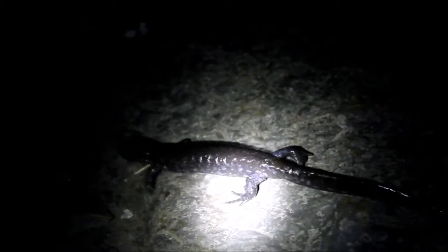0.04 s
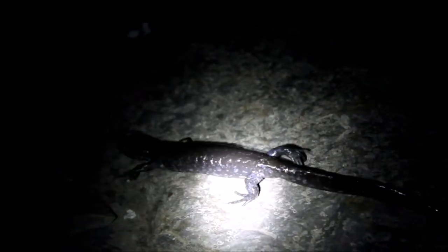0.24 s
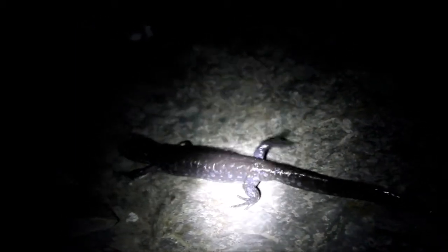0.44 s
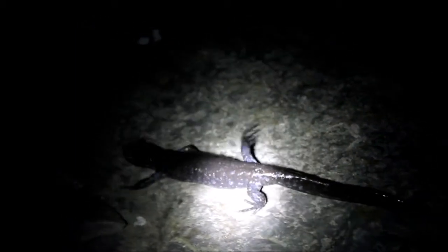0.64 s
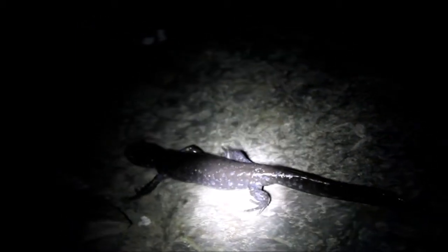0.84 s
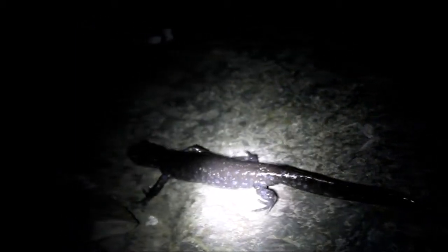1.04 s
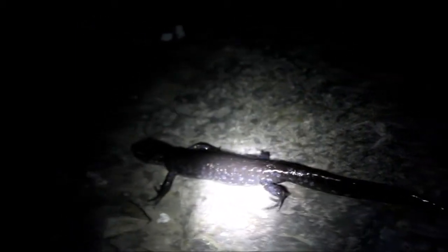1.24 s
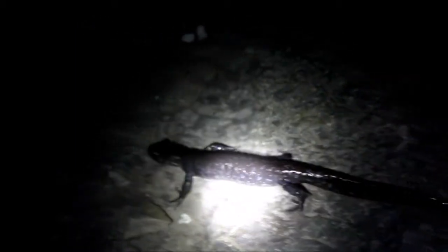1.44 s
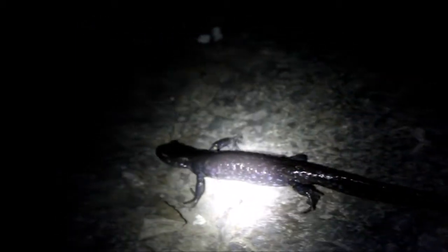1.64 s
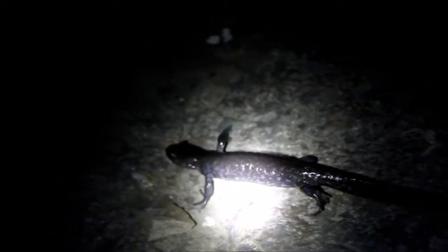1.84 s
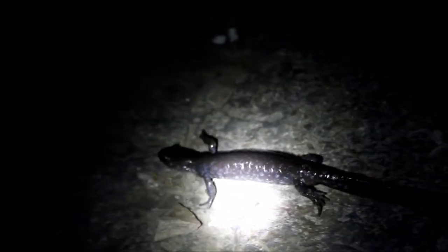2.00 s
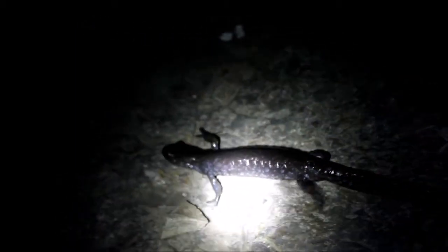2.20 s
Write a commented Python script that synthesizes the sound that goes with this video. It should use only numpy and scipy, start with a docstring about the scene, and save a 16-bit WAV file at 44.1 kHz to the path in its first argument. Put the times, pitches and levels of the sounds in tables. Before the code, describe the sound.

A chorus of tiny peeping frogs, mostly at middle distance with a soft woodland echo; two calls are close to the microphone, one rasping, one clean, over a quiet night floor with slight leaf ticks and a knock.

```python
"""A spring peeper close to the microphone gives one clean rising whistle at night, rasping at its start and end.
Another close frog cracks into a rasp; the rest call farther off around the pond and ring on among the trees.
Whistles are gliding sums of partials, their echoes are decaying noise tails; rasps are shaped noise.
A small knock (damped modes), a few ticks and soft rustling in the damp leaf litter (noise) lie over
a quiet night floor."""
import sys
import numpy as np
from scipy import signal
from scipy.fft import rfft, irfft
from scipy.io import wavfile

SR = 44100
rng = np.random.default_rng(int(sys.argv[2]) if len(sys.argv) > 2 else 0)


def persist_wave(psi):
    """Save psi, clipped to +-1, as 16-bit WAV."""
    counts = np.round(np.clip(psi, -1, 1) * 32767).astype(np.int16)
    wavfile.write(sys.argv[1], SR, np.atleast_2d(counts).T)


N = 99886
T = np.arange(N) / SR


def undb(db):
    """Decibels to gain."""
    return 10 ** (np.asarray(db) / 20)


def noise(gain):
    """Unit-rms noise whose spectrum is gain(Hz)."""
    hz = np.arange(N // 2 + 1) * SR / N + 1e-3  # the offset keeps 0 Hz out of logs and divisions
    x = irfft(rfft(rng.standard_normal(N)) * gain(hz), N)
    return x / x.std()


def band(hz, width_hz):
    """Noise in one resonance with steep skirts."""
    return noise(lambda f: 1 / (1 + ((f * f - hz * hz) / (f * width_hz)) ** 2))


def coloured(points):
    """Unit-rms noise with a spectrum drawn through (Hz, dB) points."""
    hz, db = np.array(points).T
    return noise(lambda f: undb(np.interp(np.log(f), np.log(hz), db)))


def walk(rate_hz):
    """Smooth random wandering with unit spread."""
    return noise(lambda f: np.exp(-(f / rate_hz) ** 2))


def fade(start, decay_s):
    """Sudden onset and exponential decay."""
    return (T >= start) * np.exp(-np.maximum(T - start, 0) / decay_s)


def low_cut(x, hz):
    """Second-order high-pass that takes the lows off."""
    return signal.sosfilt(signal.butter(2, hz, "high", fs=SR, output="sos"), x)


# Spectrum of the open night air: f/Hz, relative level/dB per Hz
NIGHT_COLOUR = [(25, -12), (50, -2), (110, 2.5), (200, 1.5), (450, -3.5), (1000, -4), (2000, -6),
                (4000, -10.5), (6500, -11.5), (8500, -14.5), (10500, -19.5), (15800, -19)]
NIGHT_DB = -59.5


def night_floor():
    """The steady quiet bed behind everything, as coloured noise."""
    return undb(NIGHT_DB) * coloured(NIGHT_COLOUR)


# Rustle on the ground, level followed over time: t/s, level/dB
RUSTLE_LEVELS = [(0, -58.5), (.4, -59), (.55, -69), (1.05, -71.5), (1.32, -53.5), (1.6, -59), (1.8, -63),
                 (2.26, -66)]
# Spectrum of the rustle: f/Hz, relative level/dB per Hz
RUSTLE_SPECTRUM = [(60, -22), (250, -4), (470, 7), (900, -5.5), (1400, 3.5), (2000, -10), (4500, -9),
                   (9000, -24.5), (15800, -31)]


def rustle():
    """Soft rustling in the damp leaves: coloured noise whose level wavers about the table."""
    db = np.interp(T, *np.array(RUSTLE_LEVELS).T) + 1.7 * walk(40)
    return undb(db) * coloured(RUSTLE_SPECTRUM)


# Ticks in the litter: t/s, onset level/dB before the low cut, centre f/Hz, width/Hz
LITTER_TICKS = [(0.941, -45.5, 5560, 4500), (1.169, -45.5, 5700, 4500), (1.36, -53.5, 13000, 3000),
                (1.406, -61, 13000, 3970), (1.452, -34.5, 1350, 296), (1.453, -41, 3380, 2500),
                (1.531, -45.5, 6000, 7000), (1.581, -50, 5700, 6000)]
TICK_DECAY_S = 0.003


def ticks(low_cut_hz=900):
    """Ticks in the damp leaves: short bursts of resonant noise."""
    bursts = sum(undb(db) * fade(start, TICK_DECAY_S) * band(hz, width_hz)
                 for start, db, hz, width_hz in LITTER_TICKS)
    return low_cut(bursts, low_cut_hz)


# Damped modes of the knock: f/Hz, onset level/dB before the low cut, 60 dB decay time/s
KNOCK_MODES = [(454, -35, 0.025), (730, -29.5, 0.017), (1015, -32.5, 0.0091), (3690, -32.5, 0.0094),
               (6470, -31.5, 0.005), (8070, -34, 0.0086), (10100, -65, .006)]
KNOCK_S = 1.8537
CRACK_DB, CRACK_DECAY_S = -39.5, 0.002  # levels before the low cut
THUD_DB, THUD_DECAY_S = -44.5, 0.009


def knock(low_cut_hz=130):
    """A small hard contact near the microphone: crack, damped modes and a dull thud."""
    ring = sum(undb(db) * fade(KNOCK_S, t60 / np.log(1000)) * np.sin(2 * np.pi * hz * (T - KNOCK_S))
               for hz, db, t60 in KNOCK_MODES)
    crack = undb(CRACK_DB) * fade(KNOCK_S, CRACK_DECAY_S) * band(4500, 13000)
    thud = undb(THUD_DB) * fade(KNOCK_S, THUD_DECAY_S) * band(600, 1100)
    return low_cut(ring + crack + thud, low_cut_hz)


WOODS_T60_S, WOODS_DELAY_S, WOODS_GRAIN = 0.71, 0.012, 0.97  # grain: unevenness of the tail
WOODS_HZ, WOODS_WIDTH_HZ = 2600, 1400  # the band that carries between the trunks


def woods(x):
    """Echo from many trunks, different for each calling place, with the energy of the direct call."""
    grain = np.exp(WOODS_GRAIN * walk(200))
    decay = np.exp(-np.log(1000) * T / WOODS_T60_S) * (T > WOODS_DELAY_S)
    tail = band(WOODS_HZ, WOODS_WIDTH_HZ) * grain * decay
    echo = signal.fftconvolve(x, tail)[:len(x)]
    return echo * np.sqrt(np.sum(x ** 2) / np.sum(echo ** 2))


ATTACK_S, RELEASE_S = 0.015, 0.019
GLIDE_EASE, WAVER = 0.492, 0.0024  # early climb of the glide, random spread as a fraction of the pitch
# the call is loudest in the middle, with flutter; its overtones grow in over the first half
FLUTTER_DB, SWELL_DB, BLOOM_DB = 1.5, 0.5, 11.5


def peep(start, length, from_hz, to_hz, db, echo_db, partials):
    """One whistle: the pitch climbs and levels off as the vocal sac fills."""
    u = np.clip(T / length, 0, 1)
    glide = u + GLIDE_EASE * u * u * (1 - u) * 2
    hz = (from_hz + (to_hz - from_hz) * glide) * (1 + WAVER * walk(46))
    phase = np.pi * np.cumsum(hz) / SR  # half the pitch: the whistle is the second multiple

    on = T < length
    bloom = undb(BLOOM_DB * np.minimum(2 * u[on] - 1, 0))
    call = np.zeros(N)
    for k, (_, partial_db) in enumerate(partials, 1):
        call[on] += undb(partial_db) * np.sin(k * phase[on]) * (bloom if k > 2 else 1)

    ramp = np.clip(np.minimum(T / ATTACK_S, (length - T) / RELEASE_S), 0, 1)
    swell_db = SWELL_DB * (np.sin(np.pi * u) - 2 / np.pi)
    call *= np.sin(np.pi / 2 * ramp) ** 2 * undb(FLUTTER_DB * walk(55) + swell_db)

    # direct and echo share the level
    heard = (call + undb(echo_db) * woods(call)) * undb(db) / np.hypot(1, undb(echo_db))
    return np.interp(np.arange(N) - round(start * SR), np.arange(N), heard, left=0, right=0)


# Calls around the pond: start t/s, length t/s, start f/Hz, end f/Hz, rms level/dB with echo,
# echo level/dB re direct, level/dB re whistle of the undertone an octave below
POND_CALLS = [(-0.12, 0.23, 2604, 2916, -43, 3, -17), (-0.01, .17, 2648, 2941, -38.5, 2.5, -21),
              (0.107, 0.12, 2560, 2795, -39, -2.5, -18.5), (0.15, 0.15, 2650, 2896, -40, 2.5, -21.5),
              (0.225, 0.21, 2720, 2996, -45, -4, -16.5), (0.319, 0.15, 2689, 2930, -37, -4.5, -20),
              (0.468, .08, 2954, 2986, -45, -10, -37), (0.745, .22, 2483, 2580, -42, 0, -37.5),
              (0.905, 0.17, 2706, 3003, -36.5, -2, -24), (0.935, 0.13, 2323, 2480, -52.5, -10, -17),
              (1.125, 0.2, 2490, 2792, -40.5, 5.5, -22.5), (1.168, 0.2, 2680, 3044, -45.5, -5, -14),
              (1.24, 0.15, 3150, 3470, -55.5, 6, -37), (1.27, .19, 2480, 2679, -43, 7, -24),
              (1.345, 0.19, 2590, 3008, -38.5, 3, -23), (1.455, .19, 2620, 2880, -38.5, 2, -31),
              (1.465, 0.101, 2870, 3054, -38, -4, -42), (1.54, 0.18, 2720, 2983, -41.5, 1.5, -16.5),
              (1.62, .19, 2770, 2968, -47, -7, -20), (1.957, .22, 2622, 2970, -45.5, -4, -24),
              (2.175, .18, 2675, 3022, -34.5, 1, -22.5)]
# Overtones above the whistle; the vocal sac rings on the second multiple:
# multiple of the vocal-fold rate, level/dB re whistle
POND_OVERTONES = [(3, -30), (4, -51.5), (5, -48)]
CHORUS_HZ, CHORUS_WIDTH_HZ, CHORUS_DB = 2646, 720, -64


def chorus():
    """The frogs around the pond, over a wavering noise wash of very distant ones."""
    calls = sum(peep(*row, [(1, under_db), (2, 0)] + POND_OVERTONES) for *row, under_db in POND_CALLS)
    wash = undb(CHORUS_DB + 2 * walk(6.5)) * band(CHORUS_HZ, CHORUS_WIDTH_HZ)
    return np.sqrt(2) * calls + wash  # sqrt(2) makes the sine levels rms


# Course of the cracked call, close by: t/s, pitch f/Hz, level/dB, roughness 0-1
CRACKED_COURSE = [(0, 2986, -25.5, 0.1), (.035, 3022, -29.5, 0.1), (.066, 2980, -28.5, .08),
                  (.082, 3040, -36, 1), (0.108, 3083, -33.5, 0.6), (0.139, 3137, -44.5, 0.63),
                  (.16, 2980, -67, .8)]
# Its partials, the folds beating strong-weak: multiple of a quarter of the pitch, level/dB re call
CRACKED_TONES = [(2, -27.5), (3, -23.5), (4, 0.5), (5, -20), (6, -23), (7, -32), (8, -34.5), (9, -33.5),
                 (10, -37.5), (11, -34)]
# Spectrum of its scrape: f/Hz, relative level/dB per Hz
CRACKED_SCRAPE = [(1500, -23.5), (2400, -4), (3500, 4.5), (4400, 1.5), (5200, -21), (8300, -21.5),
                  (10000, -46)]
CRACK_JITTER, CRACK_SCRAPE_DB = 0.022, -13  # pitch fraction and level re call, at full roughness


def cracked_frog(echo_db=-16):
    """A reedy call with subharmonics that breaks into a rasp as pitch and partials turn unsteady."""
    times, *columns = np.array(CRACKED_COURSE).T
    hz, db, rough = (np.interp(T, times, column) for column in columns)
    jittered_hz = hz * (1 + CRACK_JITTER * rough * walk(1000))
    phase = np.pi / 2 * np.cumsum(jittered_hz) / SR  # a quarter of the pitch

    tones = 0
    for k, (_, tone_db) in enumerate(CRACKED_TONES, 2):
        depth = 1 if tone_db < -10 else 0.3  # the strong partial shakes less
        tones = tones + undb(tone_db) * np.sin(k * phase) * (1 + rough * walk(350) * depth)

    scrape = undb(CRACK_SCRAPE_DB) * rough * coloured(CRACKED_SCRAPE)
    call = (np.sqrt(2) * tones + scrape) * undb(db) * (T < times[-1])
    return call + undb(echo_db) * woods(call)


# The closest caller's partials: multiple of half the pitch, level/dB re call
CLOSE_PARTIALS = [(1, -34.5), (2, -1), (3, -36.5), (4, -45), (5, -46.5), (6, -49.5), (7, -59.5), (8, -70),
                  (9, -59)]
# Brief rasps as its folds start and stop: start t/s, length t/s, pitch f/Hz,
# squeak peak level/dB, scrape peak level/dB, both before NEAR_LIFT
CLOSE_RASPS = [(0.525, 0.024, 2480, -43, -67), (0.537, 0.033, 2530, -51.5, -49),
               (0.73, 0.023, 2850, -42, -63.5)]
# Spectrum of the scrape in those rasps: f/Hz, relative level/dB per Hz
CLOSE_SCRAPE = [(1000, -35.5), (1700, 9), (2500, -9), (3400, -1), (4400, -9.5), (5300, -29)]
NEAR_START_S, NEAR_LENGTH_S, NEAR_FROM_HZ, NEAR_TO_HZ = 0.536, 0.218, 2532, 2745
NEAR_DB, NEAR_ECHO_DB = -26.5, -14.5  # level before NEAR_LIFT, echo re direct
NEAR_LIFT = np.sqrt(2)  # gain on the whole close frog, 3 dB
RASP_WIDTH_HZ = 130


def near_frog():
    """The close peep, rasping briefly before the folds lock onto their pitch and as they let go."""
    whistle = peep(NEAR_START_S, NEAR_LENGTH_S, NEAR_FROM_HZ, NEAR_TO_HZ,
                   NEAR_DB, NEAR_ECHO_DB, CLOSE_PARTIALS)
    out = np.sqrt(2) * whistle
    for start, length, hz, squeak_db, scrape_db in CLOSE_RASPS:
        squeak = undb(squeak_db) * band(hz, RASP_WIDTH_HZ)
        scrape = undb(scrape_db) * coloured(CLOSE_SCRAPE)
        arch = np.sin(np.pi * np.clip((T - start) / length, 0, 1))
        out = out + arch * (squeak + scrape)
    return NEAR_LIFT * out


def scene():
    """The night floor, the ground sounds and the frogs, on one channel."""
    ground = rustle() + ticks() + knock()
    frogs = chorus() + cracked_frog() + near_frog()
    return (night_floor() + ground + frogs)[None]


def record(dry):
    """The recorder cuts the top steeply above 15900 Hz."""
    return signal.sosfilt(signal.ellip(10, 0.2, 70, 15900, fs=SR, output="sos"), dry)


dry = scene()
out = record(dry)
persist_wave(out)
```